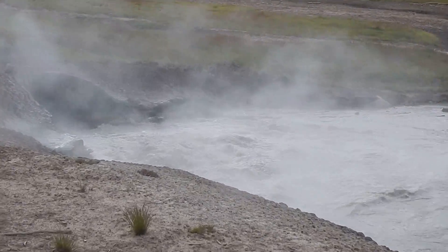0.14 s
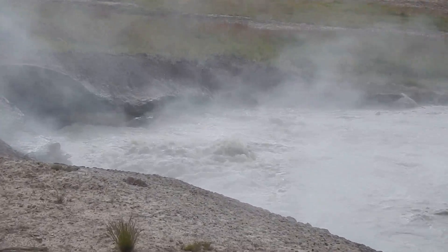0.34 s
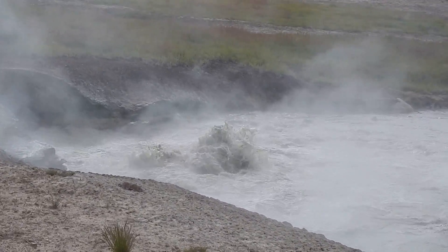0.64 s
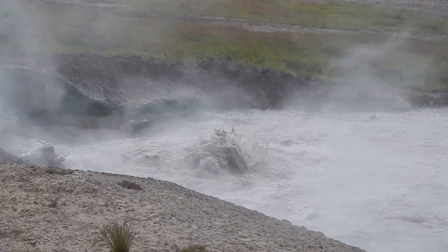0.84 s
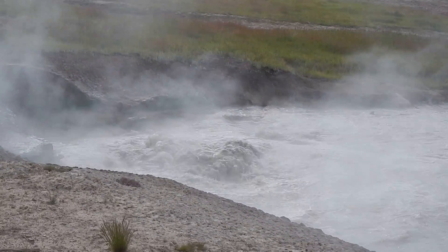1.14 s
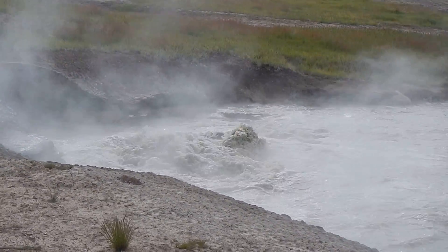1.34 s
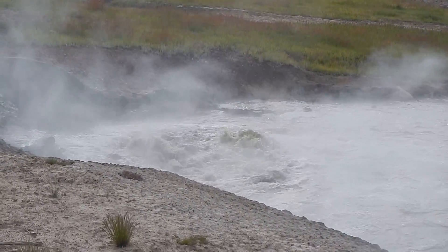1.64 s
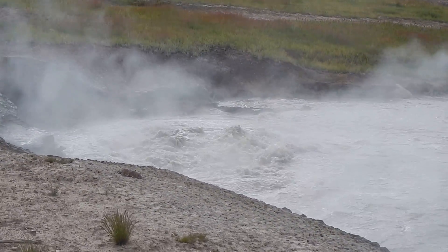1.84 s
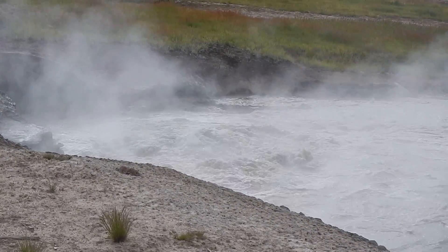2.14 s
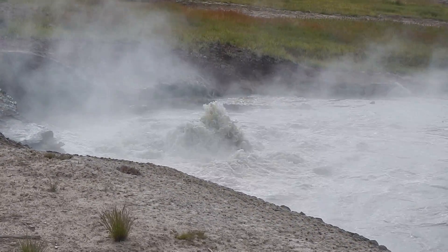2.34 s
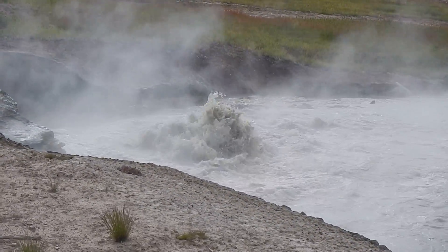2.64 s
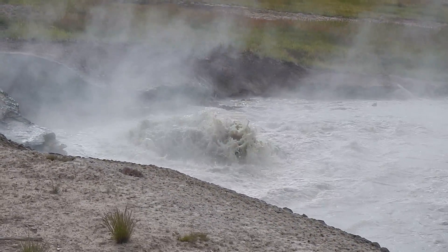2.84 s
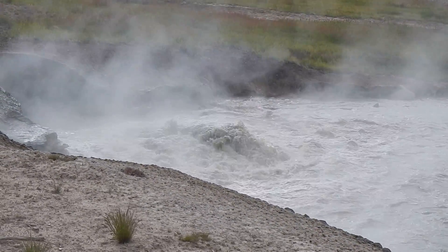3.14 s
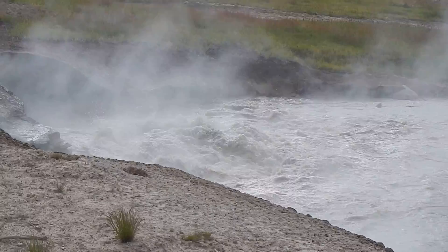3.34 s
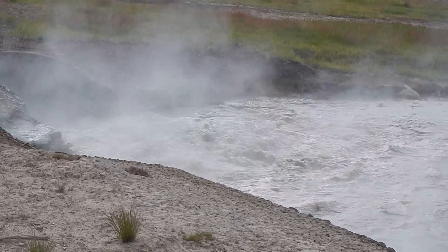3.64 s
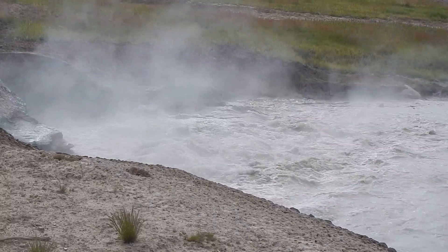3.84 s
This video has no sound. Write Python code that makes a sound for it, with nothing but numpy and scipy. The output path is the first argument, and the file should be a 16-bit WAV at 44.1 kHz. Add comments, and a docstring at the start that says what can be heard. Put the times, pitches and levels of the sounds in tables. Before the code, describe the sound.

Churning, bubbling wash of a boiling pool outdoors, with increasingly heavy low wind buffeting.

```python
"""A wash of falling water full of bursting bubbles: a boiling mud pool churns and splashes some metres away.
The wash is noise with drifting patches, the bubbles are rising decaying sines, and loud drops ring above.
Wind eddies buffet two microphone ports: lumpy low noise, and bumps of a few swings with a sharp edge.
The housing around the ports carves notches into the treble."""
import sys
import numpy as np
from scipy import signal
from scipy.fft import rfft, irfft
from scipy.io import wavfile
from scipy.ndimage import uniform_filter1d

SR = 44100
rng = np.random.default_rng(int(sys.argv[2]) if len(sys.argv) > 2 else 0)


def output_pcm(signal):
    """Save a mono or channel-first signal as 16-bit PCM at the path in sys.argv[1].

    Samples are clipped to [-1, 1] before scaling.
    """
    pcm = np.clip(np.atleast_2d(signal).T, -1, 1) * 32767
    wavfile.write(sys.argv[1], SR, np.round(pcm).astype(np.int16))


N = 176400  # samples: 4 s


def amp(db):
    """Level law: decibels to amplitude ratio."""
    return 10 ** (np.asarray(db) / 20)


def evened(x):
    """Power normalisation: scales to rms 1."""
    return x / np.sqrt(np.mean(x ** 2) + 1e-20)


def smoothed(x, first, second, axes=(-1, -1)):
    """Low-pass smoothing: two running means in turn, with widths in steps."""
    return uniform_filter1d(uniform_filter1d(x, first, axis=axes[0]), second, axis=axes[1])


def read(points, hz):
    """Logarithmic pitch scale: interpolates a table along log frequency."""
    f, value = np.transpose(points)
    return np.interp(np.log(hz + 1), np.log(f + 1), value)


def curve(points, axis=1):
    """Slow envelope: interpolates a table column along time."""
    return np.interp(np.arange(N) / SR, np.transpose(points)[0], np.transpose(points)[axis])


def add(mix, s, sound):
    """Superposition: mixes a sound in at time s."""
    part = mix[max(round(s * SR), 0):][:len(sound)]
    part += sound[:len(part)]


def coloured(points):
    """Spectral shaping: independent white noise for each port, filtered to the given colour."""
    gain = amp(read(points, np.fft.rfftfreq(N, 1 / SR)))
    return evened(irfft(rfft(rng.standard_normal((2, N))) * gain, N))


def wash():
    """Random superposition: falling water as flat noise with drifting patches and a broadband flicker."""
    patchy_db, flicker_db = 1.23, 0.83  # rms of each
    frames = N // 128 + 5
    real, imaginary, patches = rng.standard_normal((frames, 514, 3)).T.reshape(3, 2, 257, frames)
    # both ports share the patches and the flicker
    patches = evened(smoothed(patches[0], 6, 16, axes=(0, 1)))
    flicker = evened(uniform_filter1d(rng.standard_normal(frames), size=3))
    spectrum = (real + 1j * imaginary) * amp(patchy_db * patches + flicker_db * flicker)
    return evened(signal.istft(spectrum, nperseg=512, noverlap=384)[1][:, :N])


def bubbles():
    """Bubble resonance: many short damped sines of rising pitch at random times, a few of them strong."""
    per_s, spread_db, ring_cycles = 4000, 7, 5.3
    strength = amp(spread_db * np.minimum(rng.exponential(1, (2, N)), 3))
    strength = strength * (rng.random((2, N)) < per_s / SR)
    pitches = np.geomspace(150, 8000, 30)  # Hz
    kind = rng.integers(0, len(pitches), (2, N))
    out = np.zeros((2, N))
    for k, hz in enumerate(pitches):
        turns = np.arange(int(3 * ring_cycles * SR / hz)) * hz / SR
        envelope = np.exp(-2 * turns / ring_cycles) * np.minimum(turns, 1)
        blip = np.sin(2 * np.pi * turns * (1 + 0.0091 * turns)) * envelope
        out += signal.oaconvolve(strength * (kind == k), hz * blip[None], axes=1)[:, :N]
    return evened(out)


def pool():
    """Linear filtering and partial coherence: wash and bubbles, coloured by pool and housing, surge."""
    # Splashing as surges rise and fall back. Each row: time in seconds,
    # body level in dB (of its part from 1800 to 3200 Hz), spray level in dB.
    surge = [(0, -52, -48.5), (.25, -52, -47.5), (.43, -49, -45.5), (.56, -45.5, -44.5), (.62, -46.5, -48),
             (1, -46, -47.5), (1.34, -47.5, -50), (1.6, -47.5, -47.5), (1.9, -46.5, -48), (2.0, -42, -46),
             (2.11, -50, -49.5), (2.63, -45, -47), (2.75, -47, -45.5), (2.95, -44, -43), (3.11, -41, -42),
             (3.35, -46, -46.5), (4, -45.5, -46.5)]
    # Colour of the pool heard through the housing. Each row: frequency in Hz, relative density in dB per Hz.
    pool_colour = [(30, -6), (70, -0.5), (150, -0.5), (400, -5), (750, -7), (900, -9), (2250, -11.5),
                   (2700, -13.5), (2900, -22.5), (3300, -18), (4050, -9), (4300, -13), (4700, -26),
                   (5300, -18), (5900, -17), (6600, -25.5), (8500, -43), (11000, -57)]
    # Notches of the housing. Each row: centre in Hz, width in Hz, gain at the centre in dB.
    notches = [(2480, 110, -9), (3200, 110, -19), (5000, 60, -8)]
    # Coherence of the ports. Each row: frequency in Hz, left-right correlation from 0 to 1.
    likeness = [(60, 0.96), (500, 0.98), (1800, 0.94), (2740, 0.73), (6400, 0.63)]
    # Balance of the ports. Each row: frequency in Hz, left over right in dB.
    balance = [(1800, 0), (2740, -4.5), (4190, 3.5), (6400, -3)]
    bubbles_db = -11.5  # relative to the wash
    low_hz, spray_hz = 524, 3200
    low_follows = 0.22  # the deep boil follows the surges only in part

    hz = np.fft.rfftfreq(N, 1 / SR)
    one, other = rfft(wash() + amp(bubbles_db) * bubbles())
    same = np.clip(read(likeness, hz), 0, 1)
    common = np.sqrt((1 + same) / 2) * one
    apart = np.sqrt((1 - same) / 2) * other
    colour_db = read(pool_colour, hz)
    for centre, width, db in notches:
        colour_db = colour_db + db / (1 + (2 * (hz - centre) / width) ** 2)
    port_db = colour_db + np.outer([.5, -.5], read(balance, hz))
    spectrum = np.array([common + apart, common - apart]) * amp(port_db)

    low = 1 / (1 + (hz / low_hz) ** 2)
    high = hz > spray_hz
    body_spectrum = spectrum * (1 - low) * ~high
    deep = irfft(spectrum * low, N)
    body = irfft(body_spectrum, N)
    spray = evened(irfft(spectrum * high, N))
    gain = 1 / np.std(irfft(body_spectrum * (hz > 1800), N))

    body_db, spray_db = curve(surge), curve(surge, axis=2)
    deep_db = body_db.mean() + low_follows * (body_db - body_db.mean())
    return gain * (amp(deep_db) * deep + amp(body_db) * body) + amp(spray_db) * spray


def drops():
    """Damped oscillation: each loud drop is a short ring, roughened by a random phase."""
    # Single drops. Each row: start in seconds, peak level in dB before the onset ramp, pitch in Hz.
    drop_rows = [(0.167, -33.5, 3930), (0.498, -32, 2060), (0.548, -33, 3900), (0.552, -26, 2250),
                 (1.957, -29, 4070), (1.9765, -29, 3880)]
    ring_s, rise_s = 0.05, 0.0021  # time to fall 60 dB, onset ramp
    t = np.arange(2000) / SR
    out = np.zeros(N)
    for s, db, hz in drop_rows:
        wobble = 0.85 * evened(smoothed(rng.standard_normal(len(t)), 40, 40))  # radians
        envelope = amp(db - 60 * t / ring_s) * np.minimum(t / rise_s, 1)
        add(out, s, envelope * np.sin(2 * np.pi * hz * t + wobble))
    return out


def wind():
    """Turbulent pressure at each port: a lumpy rumble, and bumps of a few rough swings with a sharp edge."""
    # Steady push under the bumps. Each row: time in seconds, level in dB.
    push = [(0, -56), (1.1, -51), (1.22, -32.5), (1.4, -22), (1.52, -37), (1.57, -41), (1.7, -29.5),
            (2.16, -30.5), (2.25, -21), (2.44, -23.5), (2.58, -17), (2.94, -23.5), (3.02, -40), (3.14, -29),
            (3.5, -26.5), (3.69, -30.5), (3.8, -20.5), (4, -27.5)]
    # Bumps, the left port's list and then the right's. Each row: centre in seconds, level in dB,
    # pitch in Hz, level of the sharp edge in dB relative to the thump.
    bump_rows = [
        [(.557, -28.5, 100, -17), (1.017, -27.5, 59.4, -27), (1.119, -20.5, 74.5, -33), (1.274, -16, 94, -10),
         (1.314, -20, 75, -31), (1.452, -16.5, 81.6, -22), (1.745, -18, 112, -18), (1.8, -21, 113, -16),
         (1.88, -13.5, 124, -27), (1.958, -15.5, 121, -19), (2.042, -7.5, 99.6, -13.5), (2.218, -16, 101, -16),
         (2.257, -15.5, 70.8, -39), (2.293, -15.5, 95.4, -8), (2.384, -3.5, 93.8, -9.5),
         (2.425, -7, 99.2, -2.5), (2.495, -17, 112, -12), (2.543, -1.5, 158, -5), (2.644, -13.5, 82.6, -22),
         (2.682, -16.5, 74, -14), (2.748, -17, 89, -7), (2.775, -5, 120.3, -2), (2.886, -9, 109.6, -6.5),
         (2.912, -13, 122, -15), (3.123, -17.5, 53.3, -22), (3.227, -17, 63, -14), (3.297, -10.5, 99, -26),
         (3.437, -13.5, 103.6, -10), (3.741, -14.5, 98.7, -8), (3.826, -18, 160, -12), (3.945, -21, 140, -19)],
        [(1.268, -13, 79.4, -27), (1.342, -17, 198, 2), (1.497, -13.5, 143, -32), (1.527, -16.5, 123.5, -16),
         (1.804, -15, 156, -3.5), (2.055, -16, 98, -28), (2.105, -14, 85.5, -31), (2.207, -16, 119.5, -8),
         (2.23, -12.5, 94.3, -19), (2.309, -13.5, 82.6, -17), (2.376, -6, 106, -12), (2.431, -4, 133.5, -9),
         (2.498, -15, 122, -7), (2.553, -8, 225, 3.5), (2.643, -6, 170.6, -7.5), (2.656, -7, 95.6, -9),
         (2.682, -17.5, 110.8, 2), (2.757, -4, 163, -12.5), (2.78, -5, 172, -13.5), (2.883, -7.5, 112, -13.5),
         (2.919, -10, 140, -21), (3.113, -15.5, 71.6, -23), (3.229, -10, 111, -13.5), (3.288, -18, 102, -25),
         (3.628, -17, 156, -18), (3.801, -16, 104.5, -12), (3.916, -15, 94.6, -17), (3.963, -13.5, 89, -37)],
    ]
    # Colours of the thump and of the sharp edge. Each row: frequency in Hz, relative density in dB per Hz.
    thump_colour = [(15, -24), (32, 3.5), (70, 2), (130, -0.5), (220, -5.5), (350, -14), (1000, -71)]
    snap_colour = [(130, -10.5), (270, 7), (500, -7), (1000, -19), (2000, -32), (4000, -76)]
    bump_cycles, bump_rough = 2.5, .45  # length in swings, noise against a swing of rms 1
    snap_s, snap_rough = 0.005, 1  # time scale of the edge, its share of noise
    lumps_db, lump_s = 3, 0.02

    thump, snap = coloured(thump_colour), coloured(snap_colour)
    out = np.zeros((2, N))
    # an odd pulse with the colour of the edge
    kink = np.fft.fftshift(irfft(1j * amp(read(snap_colour, np.fft.rfftfreq(4096, 1 / SR)))))
    kink = kink / kink.max() * 2
    kink_t = (np.arange(4096) - 2048) / SR
    rows = [(port, *row) for port, table in enumerate(bump_rows) for row in table]
    for (port, s, db, hz, edge_db), start in zip(rows, rng.random(len(rows))):
        t = np.arange(-bump_cycles / hz / 2, bump_cycles / hz / 2, 1 / SR)
        # a stretch of noise that differs from the rumble under the bump
        first = int(s * SR * .9)
        at = 1 - port, slice(first, first + len(t))
        shape = np.cos(np.pi * t * hz / bump_cycles) ** 2
        edge = np.exp(-(t / snap_s) ** 2)
        swing = np.sqrt(2) * np.cos(2 * np.pi * (hz * t + start)) + bump_rough * thump[at]
        body = shape * swing
        crack = edge * (np.sign(start - .5) * np.interp(t, kink_t, kink) + snap_rough * snap[at])
        # each part takes the energy of its envelope
        body = body * np.linalg.norm(shape) / np.linalg.norm(body)
        crack = crack * np.linalg.norm(edge) / np.linalg.norm(crack)
        add(out[port], s + t[0], amp(db) * (body + amp(edge_db) * crack))
    width = int(lump_s * SR)
    lumps = evened(smoothed(rng.standard_normal((2, N)), width, width))
    rumble = evened(amp(lumps_db * np.minimum(lumps, 2)) * thump[:, ::-1])
    return out + amp(curve(push)) * rumble


def scene():
    """Linear superposition of pool, drops and wind."""
    return pool() + drops() + wind()


def record(dry):
    """Gain control: hiss, a limiter ducking everything after the hardest bumps, soft ceiling, band limit."""
    # Colour of the microphone hiss. Each row: frequency in Hz, relative density in dB per Hz.
    hiss_colour = [(9000, -9.5), (15000, -11.5)]
    hiss_db = -64
    limit_db, limit_share, recover_db_per_s = -1.5, 1, 27.5  # share: part of the excess taken off
    speed = 1 / (.006 * SR)  # takes hold in 6 ms
    edge_hz = 15780

    x = dry + amp(hiss_db) * coloured(hiss_colour)
    # the louder port's peaks, held and falling at the recovery rate
    fall = np.arange(N) * recover_db_per_s / SR
    level_db = 20 * np.log10(abs(x).max(0) + 1e-9)
    held_db = np.maximum.accumulate(level_db + fall) - fall
    over_db = np.maximum(held_db - limit_db, 0)
    x = x / amp(limit_share * signal.lfilter([speed], [1, speed - 1], over_db))
    rounded = x / (1 + abs(x) ** 6) ** (1 / 6)
    lowpass = signal.firwin(1023, edge_hz, window=("kaiser", 9), fs=SR)
    return signal.oaconvolve(rounded, lowpass[None], "same")


dry = scene()
out = record(dry)
output_pcm(out)
```